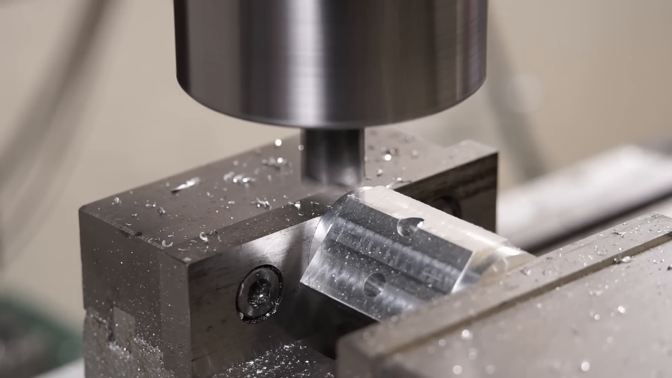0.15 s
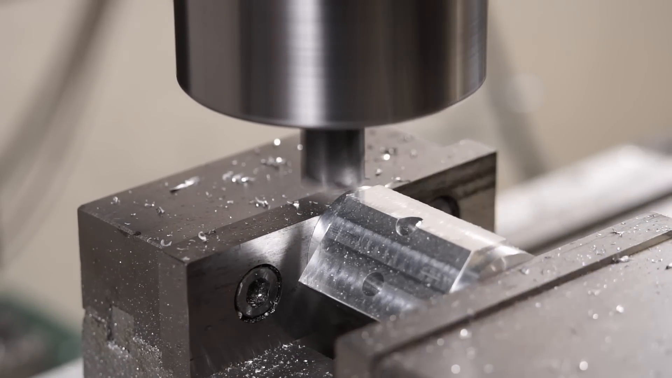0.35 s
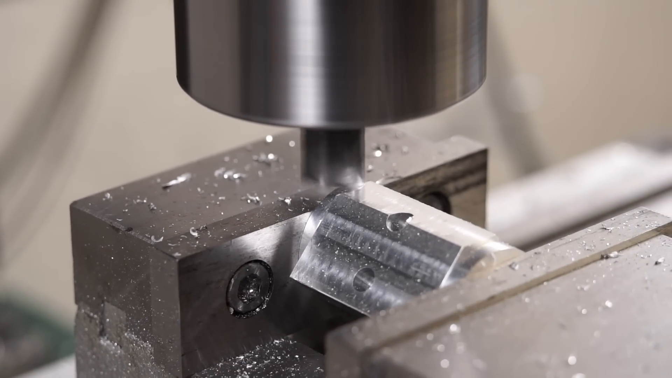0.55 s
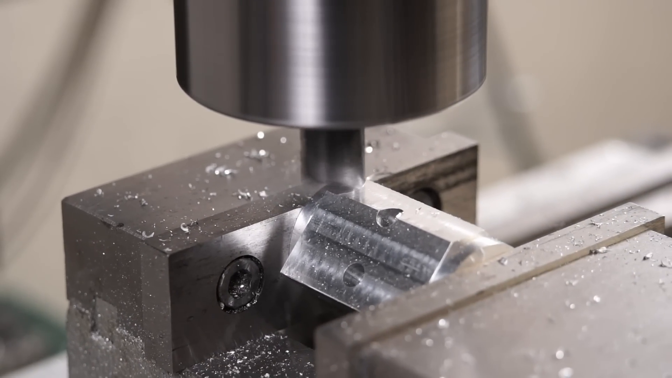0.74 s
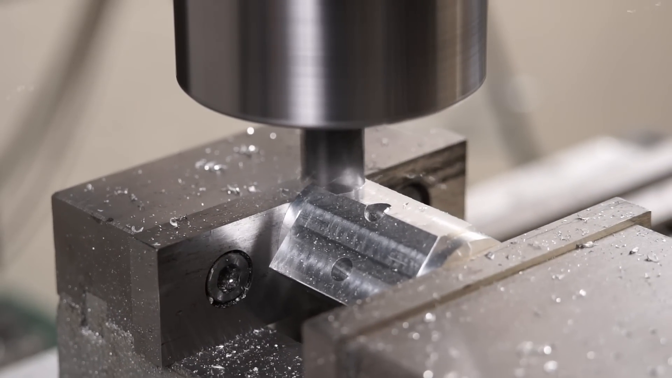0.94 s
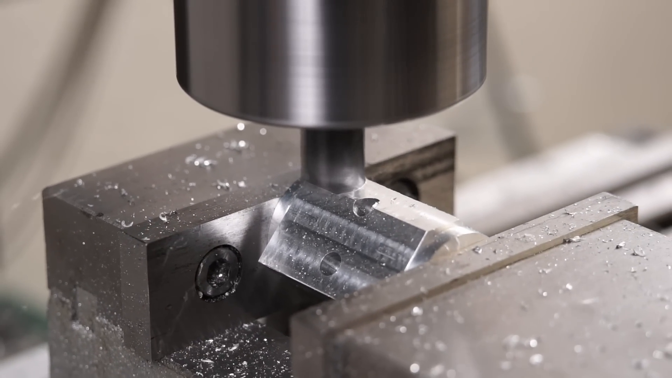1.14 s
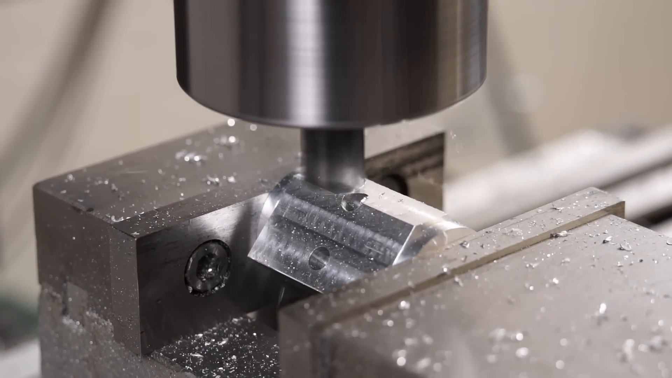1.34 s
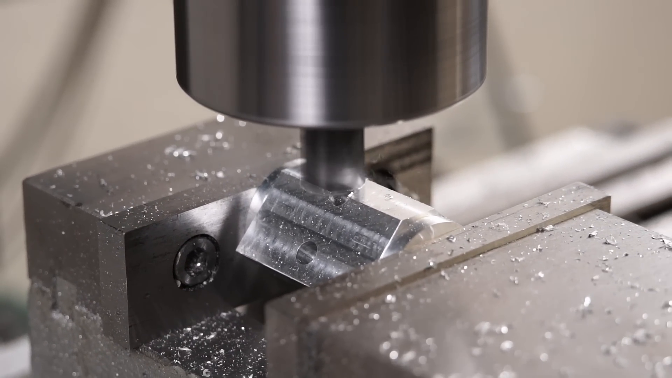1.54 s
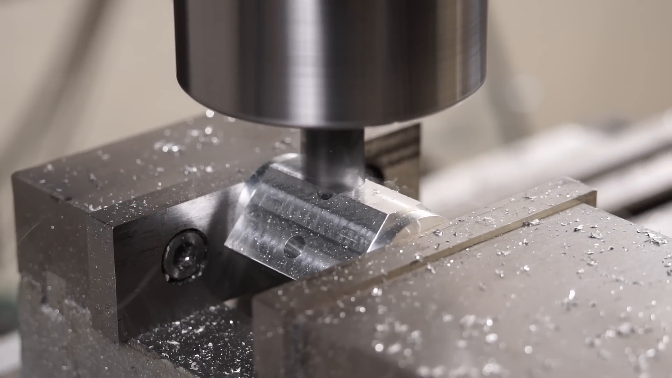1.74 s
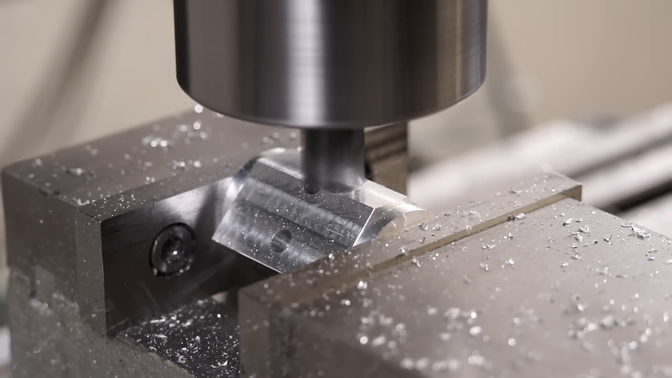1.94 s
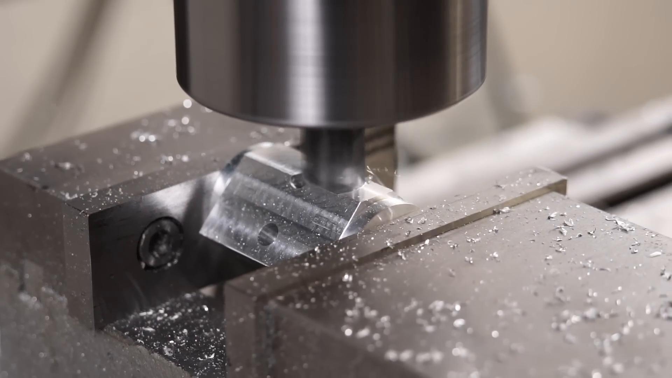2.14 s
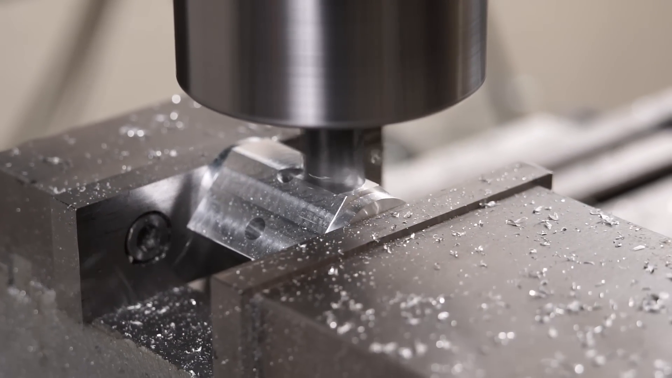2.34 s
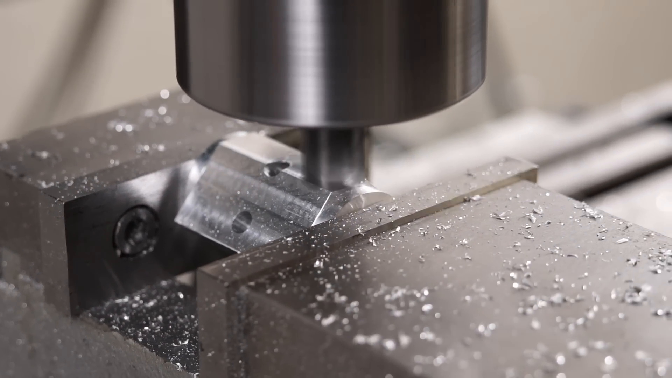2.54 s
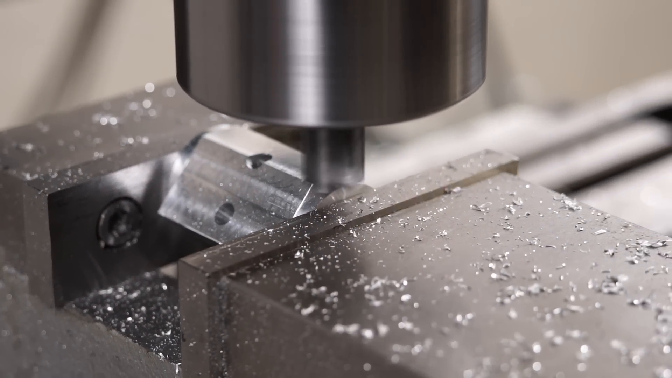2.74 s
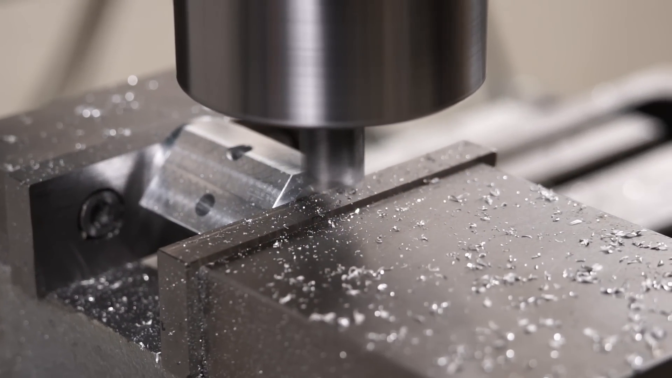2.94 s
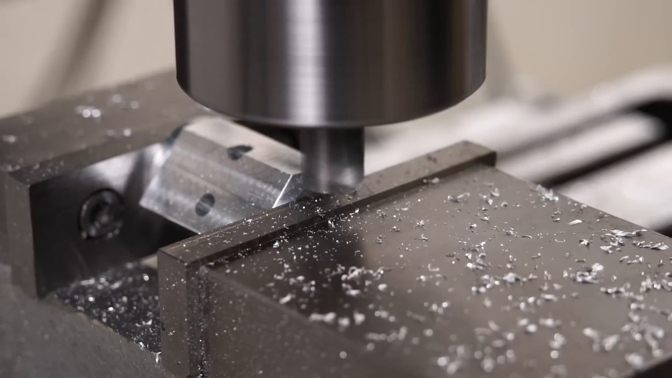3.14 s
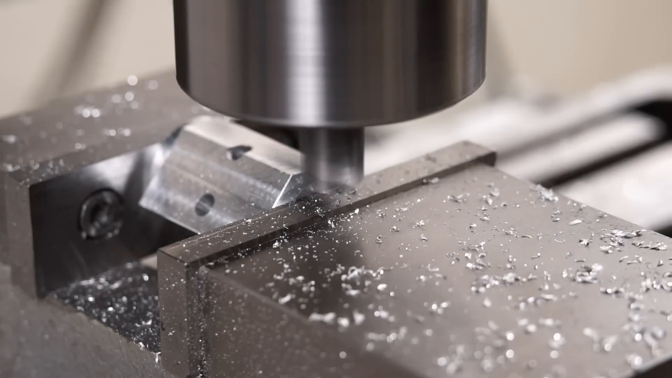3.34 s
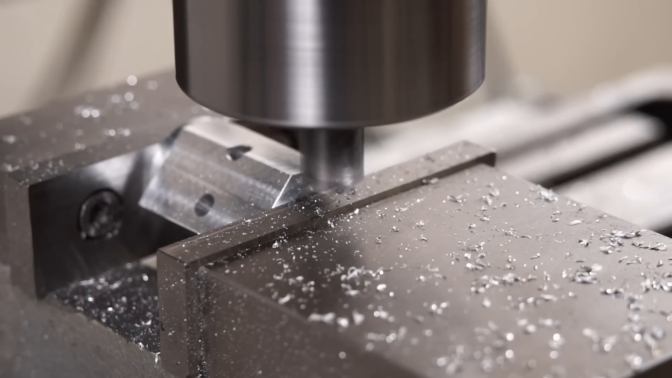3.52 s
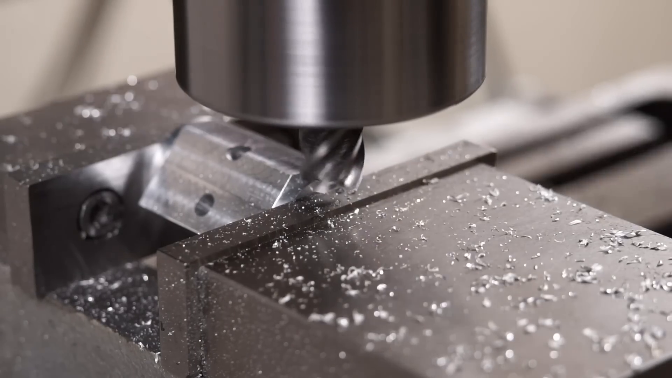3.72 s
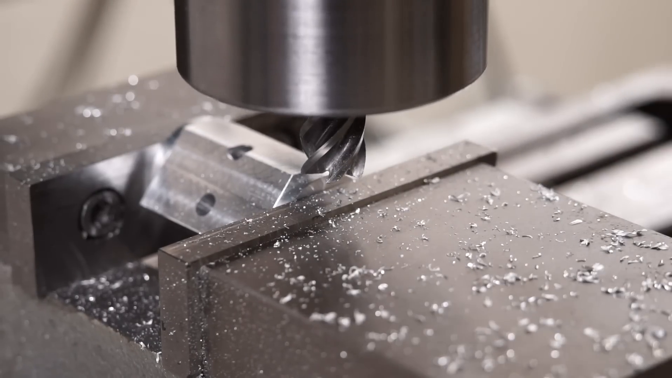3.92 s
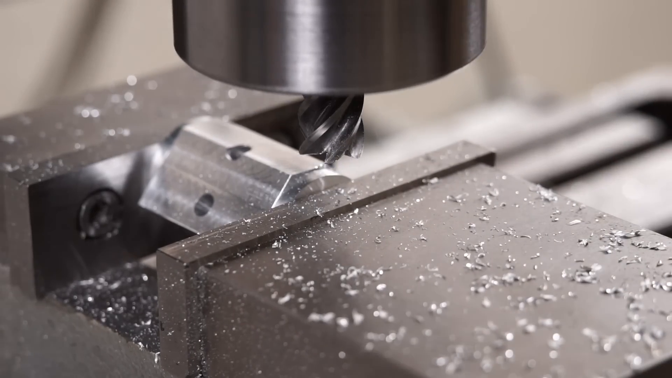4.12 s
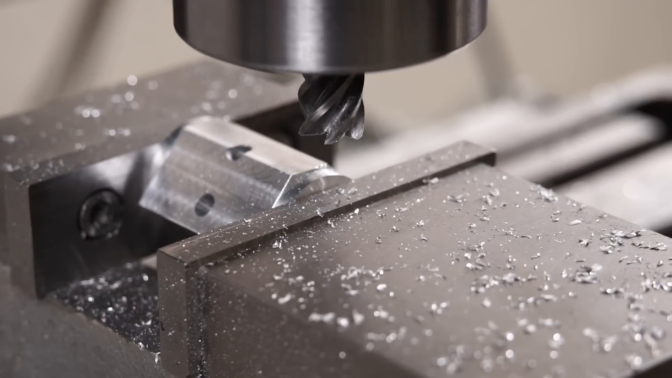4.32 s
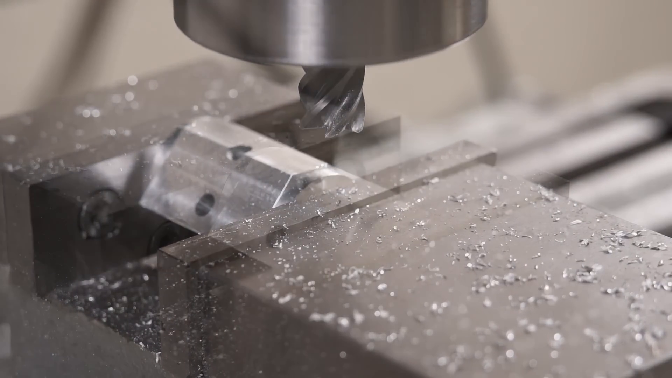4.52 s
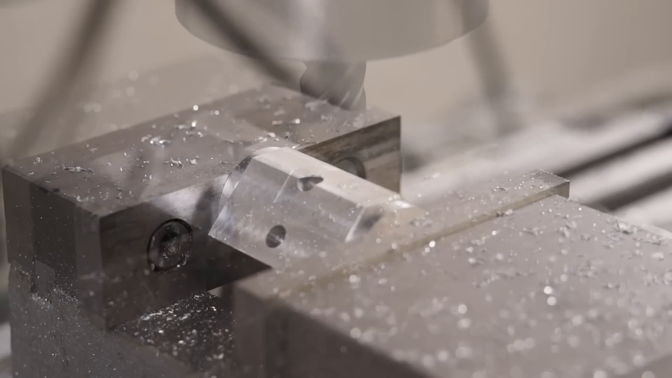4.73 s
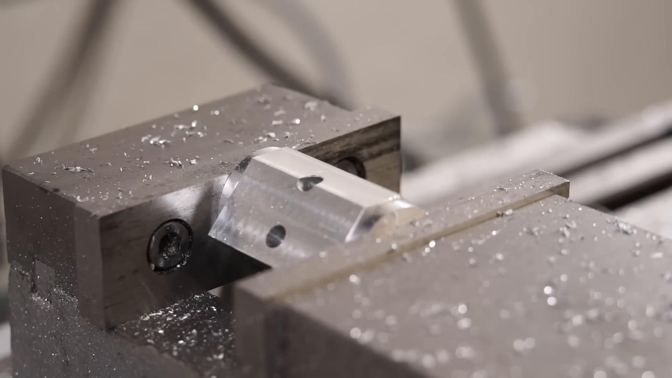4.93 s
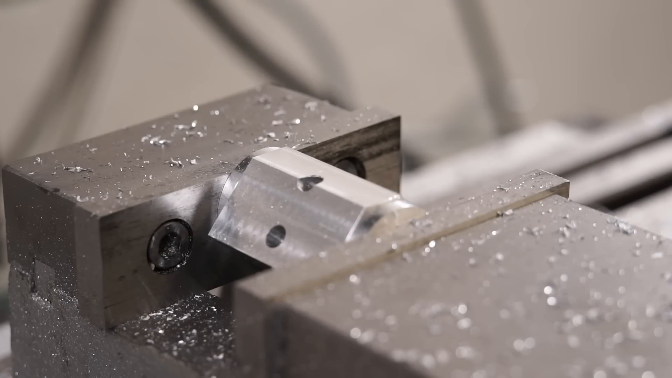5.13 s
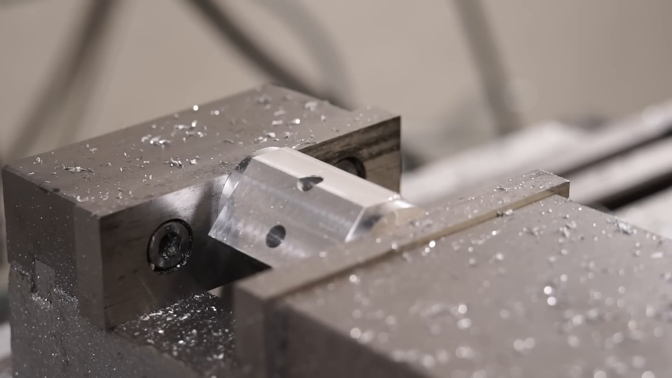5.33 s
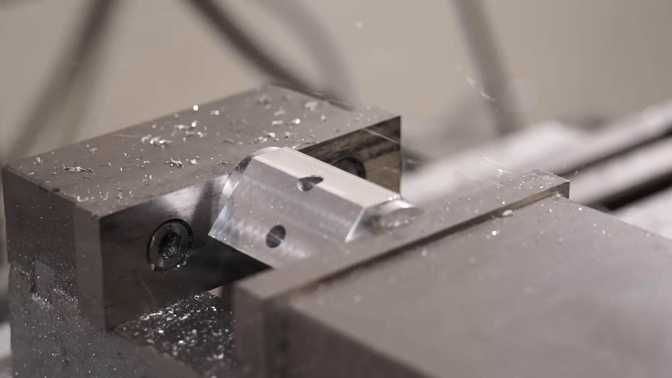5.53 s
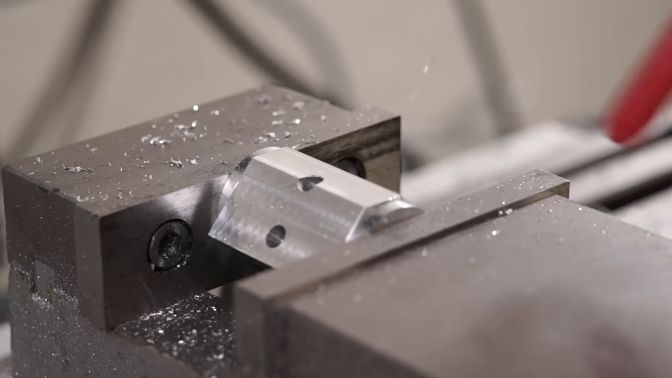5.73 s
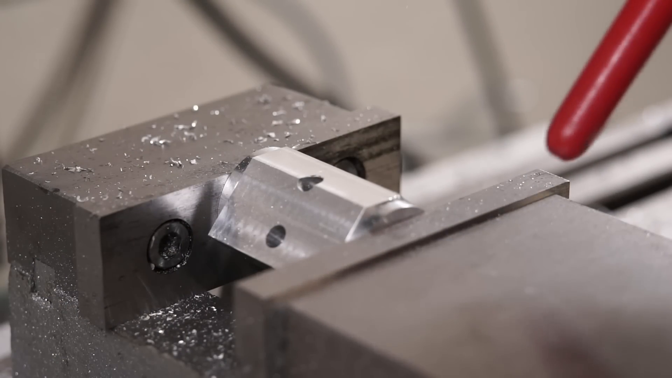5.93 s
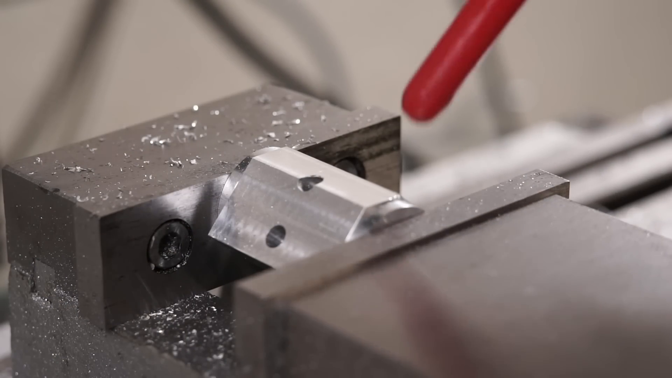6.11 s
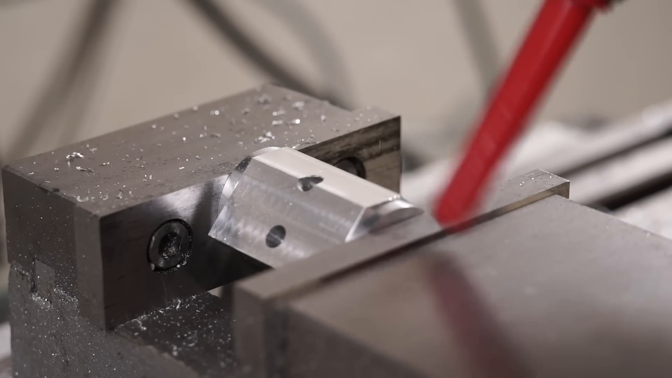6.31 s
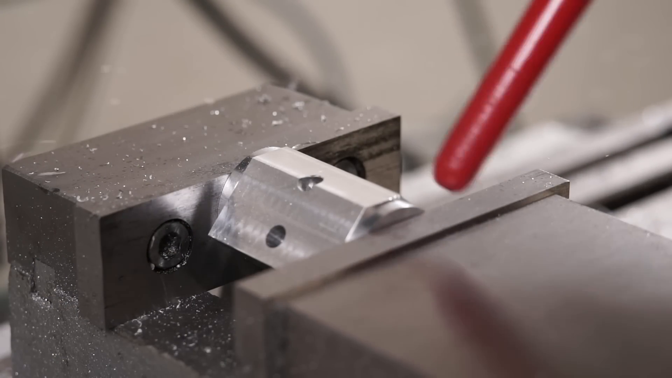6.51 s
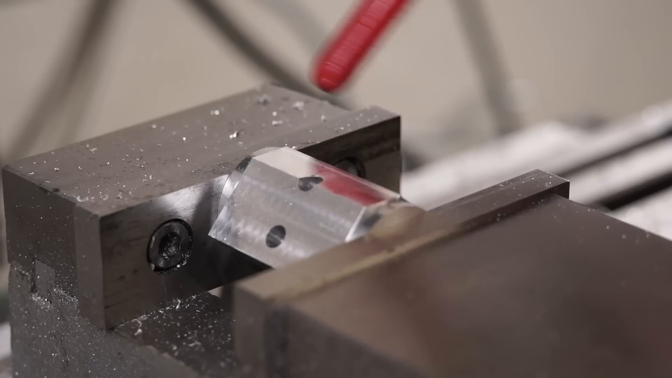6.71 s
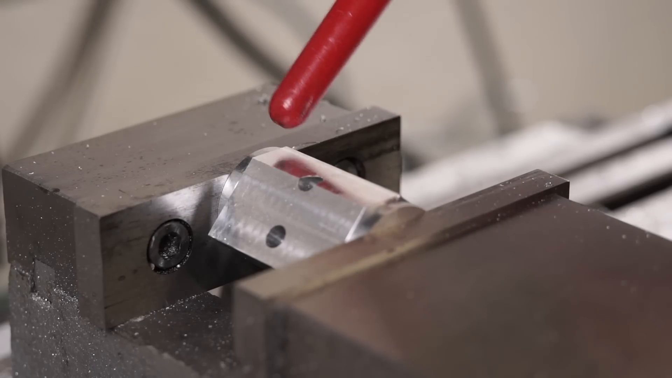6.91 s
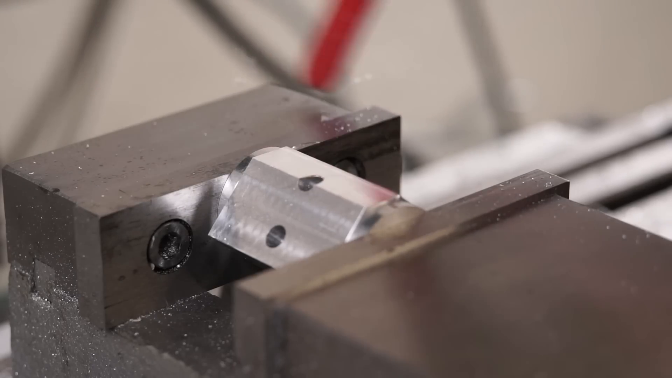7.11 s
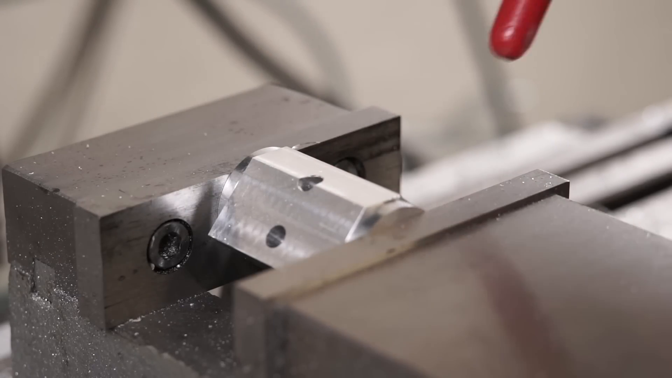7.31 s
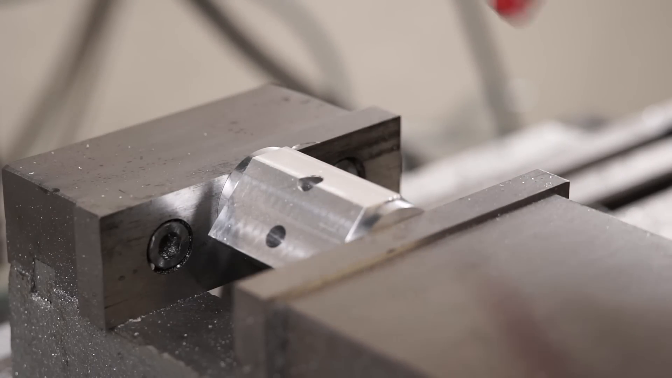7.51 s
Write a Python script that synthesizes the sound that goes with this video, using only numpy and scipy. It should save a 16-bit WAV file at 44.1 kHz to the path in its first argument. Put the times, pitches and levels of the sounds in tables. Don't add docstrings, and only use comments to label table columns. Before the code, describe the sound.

Steady metallic cutting roar winds down with scraping and knocking, a ticking motor lift follows, then rapid hissing squeezes of a hand air blower.

```python
import sys
import numpy as np
from scipy import signal
from scipy.fft import rfft, irfft, next_fast_len
from scipy.io import wavfile
from scipy.ndimage import map_coordinates

SR = 44100
rng = np.random.default_rng(int(sys.argv[2]) if len(sys.argv) > 2 else 0)


def to_wav(s):
    ch = np.atleast_2d(s).T
    pcm = np.round(np.clip(ch, -1, 1) * 32767)
    wavfile.write(sys.argv[1], SR, pcm.astype(np.int16))


def ratio(d):
    e = np.asarray(d, float) / 20
    return 10 ** e


N = 333396
COARSE = 16


def rms_one(x):
    return x / np.sqrt(np.mean(x ** 2) + 1e-20)


def in_time(table):
    s, *columns = np.transpose(table)
    return [np.interp(np.arange(N) / SR, s, c, left=-140, right=-140) for c in columns]


def coloured(spectrum):
    hz, db = np.transpose(spectrum)
    size = next_fast_len(N)
    log_hz = np.log(np.arange(size // 2 + 1) * SR / size + 1)
    shape = ratio(np.interp(log_hz, np.log(hz), db))
    return rms_one(irfft(rfft(rng.standard_normal(size)) * shape, size)[:N])


def band(x, low, high):
    return rms_one(signal.sosfilt(signal.butter(4, [low, high], "band", fs=SR, output="sos"), x))


def noise_band(low, high):
    return band(rng.standard_normal(N), low, high)


def drift(rate):
    r = np.exp(-64 * np.pi * rate / SR)
    white = rng.standard_normal(N // 32 + 1002)
    slow = signal.lfilter([1], [1, -2 * r, r * r], white)[1000:]
    return np.interp(np.arange(N) / 32, np.arange(len(slow)), rms_one(slow))


def resonances(modes, patchy_db=0., rate=14):
    white, out = rng.standard_normal(N), 0
    for k, (hz, width, db) in enumerate(modes):
        r = np.exp(-np.pi * width / SR)
        section = [1, 0, -1, 1, -2 * r * np.cos(2 * np.pi * hz / SR), r * r]
        swell = ratio(patchy_db * drift(rate)) if patchy_db else 1
        ring = signal.sosfilt([section, section], np.roll(white, 5003 * k))
        out = out + ratio(db) * swell * rms_one(ring)
    return out


def bursts(events, column, decay_s, rise_s=0.00059):
    jumps = np.full(N, 1e-18)
    rows = np.array(events)
    jumps[np.round(rows[:, 0] * SR).astype(int)] = ratio(rows[:, column])
    fall, rise = np.exp(-1 / (decay_s * SR)), np.exp(-1 / (rise_s * SR))
    return signal.lfilter([1 - rise], np.convolve([1, -fall], [1, -rise]), jumps)


def strokes(rows, column, fade_s):
    t = np.arange(N) / SR
    return sum(row[column] * np.clip(np.minimum(t - row[0], row[1] - t) / fade_s, 0, 1) for row in rows)


def hump(start, length, rise, fall, swell_db=0., size=1):
    t = np.arange(0, N, size) / SR - start
    swell = swell_db * (np.clip(t / length, 0, 1) - .5)
    return swell - rise * np.maximum(-t, 0) - fall * np.maximum(t - length, 0)


def spike(peak_s, rise_s, fall_s, haste=1):
    return hump(peak_s, 1e-4, 20 / rise_s, haste * 20 / fall_s, size=COARSE)


def filled(coarse):
    return np.interp(np.arange(N) / COARSE, np.arange(len(coarse)), coarse)


def bent(x, share):
    at = np.arange(N) + np.cumsum(share - np.mean(share))
    return map_coordinates(x, [at], order=3, mode="mirror")


# (time [s], level [dB])
SHOP_LEVEL = [(4.662, -68), (4.72, -68), (5.42, -67), (5.7, -66), (6.15, -70), (6.22, -73.5), (6.6, -80),
              (6.66, -73), (7.2, -76), (7.32, -83), (7.53, -82), (7.56, -72)]
# (frequency [Hz], density [dB per Hz])
SHOP_COLOUR = [(18, -44), (30, -14), (48, -26), (64, -18), (149, -13), (397, -5), (600, -5.5), (780, -27),
               (1320, -120)]
# (frequency [Hz], width [Hz], level [dB])
FAN_HUMS = [
    (122.7, 18, -8.5),
    (168.4, 28, -3.5),
    (192.4, 25, -7),
]


def shop():
    level_db, = in_time(SHOP_LEVEL)
    murmur = rms_one(coloured(SHOP_COLOUR) + resonances(FAN_HUMS))
    mic_hiss = noise_band(40.3, 3400) + 0.29 * noise_band(3400, 15000)
    return murmur * ratio(level_db + 1.2 * drift(6.7)) + ratio(-84.5) * mic_hiss


def lift_levels():
    start_s, stop_s, slack_s = 3.866, 4.42, 0.042
    fall = 525
    run = hump(start_s, stop_s - start_s, 9000, fall)
    late = hump(start_s + slack_s, stop_s - start_s - slack_s, 900, fall, swell_db=-6.0)
    end_stop = [(4.4757, -58.5)]   # (s, peak dB)
    bump = bursts(end_stop, column=1, decay_s=0.012) + ratio(-22.0) * bursts(end_stop, column=1, decay_s=0.083)
    idle = ratio(-73 + hump(3.8, 0.076, 300, 300))
    motor = ratio(-47 + run) + bump + idle
    slide = ratio(-61.5 + np.minimum(run, late)) + ratio(2.0) * bump
    thin = ratio(-82.5 + run) + ratio(-20.0) * bump
    return motor, slide, thin


# (frequency [Hz], density [dB per Hz])
LIFT_COLOUR = [(24, -65), (40, -34), (226, -8.5), (529, 4), (770, -3), (942, 4), (1950, -18), (2440, -15),
               (3830, -25), (7170, -23.5), (16000, -70)]
# (frequency [Hz], width [Hz], level [dB])
COLUMN = [(580, 74, -7), (970, 250, -1), (1626, 240, -6.5), (2390, 87, -3.5), (3050, 84, -19),
          (3260, 130, -10)]
# (frequency [Hz], width [Hz], level [dB])
SLIDE_MODES = [(5250, 500, -11), (7200, 820, -13), (8100, 400, -18)]
# (time [s], peak [dB], bright part [dB])
TICKS = [(3.8678, -62, -63), (3.9114, -47, -62), (3.919, -54, -74), (3.9594, -47, -62),
         (3.9943, -41.5, -57), (4.022, -48, -72), (4.058, -42.5, -66), (4.066, -51, -70), (4.117, -42, -60),
         (4.1434, -60, -64), (4.1765, -39, -60), (4.19, -49, -66), (4.252, -43, -56), (4.295, -55, -66),
         (4.306, -36.5, -62), (4.334, -53, -58), (4.383, -48, -62), (4.45, -54, -76), (4.4772, -42, -55),
         (4.619, -74, -79)]
# (frequency [Hz], width [Hz], level [dB])
TICK_MODES = [(2500, 300, -5), (3050, 500, 0), (4200, 1400, -4), (5500, 1400, -5), (7200, 1200, -7)]


def lift():
    motor, rub, faint = lift_levels()
    grind, buzz = coloured(LIFT_COLOUR), ratio(.8 * drift(70))
    drone = band(grind + ratio(-4.0) * resonances(COLUMN), 60, 1940) * motor * buzz
    slide = band(band(grind, 1660, 8500) + resonances(SLIDE_MODES), 960, 8000) * rub * buzz
    thin = band(rng.standard_normal(N) + resonances([(12700, 500, -15)]), 8000, 15000)
    thin = thin * (faint + ratio(-15.0) * bursts(TICKS, column=2, decay_s=0.0076))
    ticks = ratio(-7.0) * bursts(TICKS, column=1, decay_s=0.011) * band(resonances(TICK_MODES), 1400, 4800)
    snaps = ratio(-1.0) * bursts(TICKS, column=2, decay_s=0.014) * noise_band(4800, 7900)
    chip = [(4.3343, -44.5)]
    ping = bursts(chip, column=1, decay_s=0.0028) + ratio(-15.0) * bursts(chip, column=1, decay_s=0.02)
    ping = ratio(-6.5) * ping * resonances([(6800, 500, -2), (10000, 820, 0), (5000, 3200, -5)])
    return drone + slide + ticks + snaps + ping + thin


# (time [s], peak [dB])
CHAFES = [(3.386, -31), (3.4094, -29), (3.4301, -33), (3.458, -28), (3.466, -33), (3.481, -32),
          (3.489, -34), (3.499, -36), (3.522, -28), (3.535, -36), (3.561, -38), (3.6127, -40)]
# (frequency [Hz], width [Hz], level [dB])
CHAFE_MODES = [
    (9700, 600, -9),
    (10600, 1000, 0),
]
# (time [s], peak [dB])
SQUEAKS = [
    (3.568, -48),
    (3.613, -54),
    (3.663, -52),
    (3.747, -53),
    (3.803, -72),
]
# (frequency [Hz], width [Hz], level [dB])
SQUEAK_MODES = [(9700, 500, -3), (12700, 500, -5), (14500, 900, -8)]
# (time [s], peak [dB])
KNOCKS = [
    (3.508, -31),
    (3.54, -25.5),
    (3.592, -33),
    (3.622, -30),
    (3.6454, -36),
    (3.6733, -47),
    (3.7271, -48),
    (3.7451, -41),
    (3.756, -43),
    (3.767, -60),
]
# (time [s], level [dB])
ECHO_OF_STOP = [
    (3.75, -73),
]


def chafes():
    white = rng.standard_normal(N)
    rub = resonances(CHAFE_MODES) + .35 * band(white, 6000, 15000)
    rub = ratio(-13) * bursts(CHAFES, column=1, decay_s=0.006, rise_s=0.002) * rub
    squeak = bursts(SQUEAKS, column=1, decay_s=0.004, rise_s=0.001) * resonances(SQUEAK_MODES)
    knock = ratio(-8.0) * bursts(KNOCKS, column=1, decay_s=0.0025, rise_s=0.0007) * band(white, 1500, 6700)
    echo = bursts(ECHO_OF_STOP, column=1, decay_s=0.05) * band(white, 2000, 15500)
    return rub + squeak + knock + echo


# (time [s], pitch [Hz], level [dB])
WHINE = [(0, 852, -55), (3.1, 859, -74), (3.25, 809, -48), (3.4, 595, -50), (3.48, 470, -44),
         (3.56, 337, -48), (3.63, 248.8, -51), (3.69, 190, -57.5), (3.745, 145, -72), (3.78, 70.2, -88),
         (3.86, 39.7, -100)]


def slowed(full_db, loss_db, bend):
    hz = np.maximum(in_time(WHINE)[0], 1)
    thirds = np.maximum(np.log(WHINE[0][1] / hz) / np.log(3), 0)
    return full_db - loss_db * thirds ** bend


# (multiple [1], level [dB])
WHINE_ORDERS = [
    (2, -6.5),
    (2.32, -2),
    (3, -7),
    (4, -22),
]
# (frequency [Hz], gain [dB])
CASING = [(150, -9), (300, -7.5), (480, -0.5), (620, -4), (800, -2.5), (1000, -6), (1300, -14), (1560, 1.5),
          (1850, -10), (2300, 3.5), (3500, -9)]


def whine():
    hz, db = in_time(WHINE)
    overtones_db = slowed(-1.5, -6.794, 1)
    phase, out = 2 * np.pi * np.cumsum(hz * (1 + .025 * drift(12))) / SR, 0
    casing_hz, casing_db = np.transpose(CASING)
    for k, order_db in [(0.99, -overtones_db)] + WHINE_ORDERS:
        rate = 60 + 20 * k
        smeared = (.75 + drift(rate)) * np.sin(k * phase) + drift(rate) * np.cos(k * phase)
        radiated_db = np.interp(k * hz, casing_hz, casing_db)
        out = out + ratio(db + overtones_db + order_db + radiated_db) * smeared
    out = out + ratio(hump(3.25, 0.16, 200, 500)) * resonances([(785, 53, -48)])
    return signal.sosfilt(signal.butter(3, 170, "high", fs=SR, output="sos"), out)


# (frequency [Hz], density [dB per Hz])
SPINDLE_COLOUR = [(18, -78), (30, -35), (320, -11), (650, -5), (780, -6), (1100, -2.5), (1430, -8),
                  (2480, -7.5), (3500, -11), (5700, -12.5), (7000, -12.5), (11500, -15.5), (16000, -14)]
# (frequency [Hz], width [Hz], level [dB])
HEAD = [(2328, 25, -21), (2730, 200, -13), (2728, 60, -22), (4600, 300, -18), (5430, 200, -23),
        (6230, 130, -15.5), (6390, 170, -15.5), (6800, 200, -20), (7320, 170, -19.5), (7735, 50, -28),
        (7908, 50, -23), (8060, 120, -24), (8492, 45, -23), (8945, 45, -27), (9710, 100, -26),
        (10500, 900, -13), (13900, 570, -29), (15300, 500, -19)]
# (frequency [Hz], width [Hz], level [dB])
HOUSING = [(853.5, 84, -13.5), (922, 165, -11.5), (1028.5, 46, -13), (2070, 15, -30)]
# (start [s], end [s], level [dB])
FEED_JOLTS = [
    (0.47, 0.687, -65),
    (1.3, 1.76, -66.5),
    (2.42, 2.6, -62),
]


def spindle():
    turning = np.arange(N) < WHINE[-1][0] * SR
    shaken = coloured(SPINDLE_COLOUR) + resonances(HEAD, patchy_db=-0.5)
    load_db = np.maximum(hump(0.6, 1.9, 10, 10), -2.5)
    gear_hz = 1028 * (1 + 0.01185 * drift(8.2))
    gear = ratio(-12 + 2.5 * drift(31) + 2.0 * drift(1.4)) * np.sin(2 * np.pi * np.cumsum(gear_hz) / SR)
    shaken = shaken + ratio(slowed(3.4, 11, 0.9) + load_db) * (resonances(HOUSING) + gear)

    body = ratio(slowed(-43, 3.6, 3.2) - 2.0 + 0.23 * drift(25)) * band(shaken, 257, 2190)
    mid = ratio(slowed(-44.5, 5.7, 2.23) + 1.0 * drift(37)) * band(shaken, 1600, 5075)
    hiss = ratio(slowed(-45, 13.3, 1.65)) * band(shaken, 4170, 8920)
    top = ratio(slowed(-47, 16, 1.4)) * band(shaken, 9500, 16800)
    hiss = ratio(0.44 * drift(59)) * (hiss + top)
    grain = ratio(np.minimum(slowed(1.25, -1.3, 1), 2.8) * drift(260))
    jolts = strokes([(a, b, ratio(db)) for a, b, db in FEED_JOLTS], column=2, fade_s=0.058)
    rumble = (ratio(slowed(-66.5, 3, 1.8)) + jolts) * ratio(0.83 * drift(12.0)) * band(shaken, 20, 337)
    return turning * (body + grain * (mid + hiss) + rumble)


# (peak [s], rise [s per 20 dB], fall [s per 20 dB], level [dB], low share [0-1])
FLAPS = [
    (5.532, .05, .02, -29, .7),
    (5.652, .03, .02, -33, .6),
    (5.99, .03, .02, -28, .4),
    (6.188, .04, .04, -31, .8),
    (6.3075, .006, .02, -27, .1),
    (6.932, .005, .02, -29, .2),
    (7.205, .015, .012, -28, .05),
    (7.293, .015, .03, -32, .2),
]


def flaps(jet):
    dull, bright, out = band(jet, 3300, 7500), band(jet, 6000, 15500), 0
    for peak_s, rise_s, fall_s, db, low in FLAPS:
        gain = filled(ratio(db + spike(peak_s, rise_s, fall_s)))
        out = out + gain * (np.sqrt(low) * dull + np.sqrt(1 - low) * bright)
    return out


# (peak [s], rise [s per 20
# dB], fall [s per 20 dB], level [dB], place [0-2.5])
STRIKES = [
    (4.666, 0.003, 0.13, -48.5, 2.5),
    (5.03, 0.034, 0.25, -44, 2),
    (5.462, 0.0051, 0.19, -48.5, 0.3),
    (5.525, 0.034, 0.028, -35, 1.64),
    (5.97, 0.12, 0.17, -48.5, 0.25),
    (6.185, 0.015, 0.029, -42, 1.74),
    (6.507, 0.034, 0.021, -31.5, 2.5),
    (6.954, 0.019, 0.071, -40, 1.24),
    (7.226, 0.003, 0.16, -30, 1.79),
    (7.537, 0.027, 2.1, -35.5, 1.52),
]


def struck(haste):
    return [ratio(2 * (db + spike(peak_s, rise_s, fall_s, haste))) for peak_s, rise_s, fall_s, db, place in STRIKES]


# (full flow from [s], for [s], level [dB], low part [dB], swell to the end [dB])
REFILLS = [
    (5.72, 0.068, -28.5, 1.5, -3.5),
    (6.047, 0.063, -28, 0.5, 1.5),
    (6.376, 0.047, -29.5, 1, 2.5),
    (6.715, 0.056, -35, 1, -2.5),
    (7.05, 0.053, -34, 1, 0),
    (7.405, 0.055, -36.5, 5, -2),
]


def arch():
    t = np.arange(0, N, COARSE) / SR
    bows = []
    for start, length, *_ in REFILLS:
        half = length / 2
        bows.append(np.clip(((t - start - half) / (half + 0.017)) ** 2, 0, 1))
    return filled(np.min(bows, axis=0))


def flow(rows, layer):
    over_db, share, rise, fall = layer
    power = 0
    for start, length, db, low_db, sudden, swell_db in rows:
        shape = hump(start, length, rise * sudden, fall, swell_db, size=COARSE)
        power = power + ratio(2 * (db + over_db + share * low_db + shape))
    return power


# (full flow from [s], for [s], level [dB], rise [dB per s], haste of the fall [1])
PUFFS = [
    (4.6632, 0.045, -47.5, 9000, 1.11),
    (5.01, 0.08, -47, 1800, 0.87),
]
# (over the puff [dB], room fall [dB per s], lingering level [dB])
PUFF_LAYERS = [
    (-2.5, 75, -63),
    (0.5, 89.5, -76),
    (-8.5, 105, -76.5),
    (-12.5, 98, -75),
]
# (full flow from [s], for [s], level [dB], low part when aimed at the work [dB], suddenness [1])
SQUEEZES = [
    (5.485, 0.058, -39.5, -25, 1.8),
    (5.58, 0.072, -34, 5, 0.17),
    (5.865, 0.095, -30, 2.5, 0.82),
    (6.184, 0.1, -29.5, -1.5, 1.1),
    (6.512, 0.11, -30, -2, 1.1),
    (6.839, 0.13, -28.5, -4, 2.2),
    (7.187, 0.09, -32.5, -1, 0.9),
    (7.535, 0.05, -39, -25, 1.3),
]
# (over the stroke [dB], share of low part [1], rise [dB per s], fall [dB per s])
SQUEEZE_LAYERS = [
    (-18, 1.75, 360, 246),
    (-10.5, 1.08, 453, 396),
    (-9.5, 0.22, 454, 500),
    (0.15, 0.01, 600, 650),
]
REFILL_LAYERS = [
    (-21, 1.44, 42, 210),
    (-12.5, 0.24, 180, 380),
    (-3.5, 0.11, 400, 390),
    (0, 0.01, 560, 900),
]
SPLASH_DB = [
    -7,
    -4.5,
    -11,
    -7,
]
NEAR_S = 5.457


def blower_levels():
    t, keep = np.arange(0, N, COARSE) / SR, ratio(-120 * COARSE / SR)
    squeezes = [(*row, -1.5) for row in SQUEEZES]
    refills = [(*row[:4], 1, row[4]) for row in REFILLS]
    for k, (over_db, fall, linger_db) in enumerate(PUFF_LAYERS):
        far = (t >= PUFFS[0][0]) * ratio(2 * linger_db)
        for start, length, db, rise, haste in PUFFS:
            far = far + ratio(2 * (db + over_db + hump(start, length, rise, fall * haste, size=COARSE)))
        back = flow(refills, REFILL_LAYERS[k]) * ratio(-2 * 2 * arch()[::COARSE])
        splash = ratio(2 * SPLASH_DB[k]) * sum(struck(0.77))
        near = flow(squeezes, SQUEEZE_LAYERS[k]) + back + splash
        near = near + ratio(2 * -21) * signal.lfilter([1 - keep], [1, -keep], near) * 10
        yield filled(np.sqrt(np.where(t < NEAR_S, far, near))), filled(back / (near + 1e-20))


# (frequency [Hz], density [dB per Hz])
FAR_COLOUR = [(120, -51), (200, -9), (509, -10), (623, -2), (950, -5), (1000, -3), (2560, -9), (14900, -10),
              (16000, -22)]
# (frequency [Hz], density [dB per Hz])
JET_COLOUR = [(120, -66), (200, -53), (683, -22), (883, -14.5), (1080, -16.5), (1210, -13.5), (1590, -16),
              (2210, -12.5), (3830, -10.5), (15100, 17.5), (16000, 16)]
# (frequency [Hz], width [Hz], level [dB])
EDGES = [(4350, 460, -3), (5270, 910, 1), (6340, 600, -3.5), (6920, 300, 2), (8100, 570, -1),
         (10850, 820, -7.5), (13650, 680, -10), (13400, 750, -10), (14550, 600, -5)]
# (frequency [Hz], width [Hz], level [dB])
NOZZLE = [(6280, 200, -3), (7350, 60, -4), (7600, 150, 2.5), (8540, 60, -11), (12600, 100, -10),
          (13300, 120, -1), (13800, 200, 1), (14700, 130, 4), (14350, 120, 12), (15600, 150, 4)]
# (frequency [Hz], width [Hz], level [dB])
DEEP_SLOT = [(414, 930, 2), (636, 670, 8)]
HOLES = [(930, 190, 4), (1230, 610, 8)]
GAPS = [(2154, 340, 1.5), (2676, 180, 1), (1870, 320, -6.5)]


def blower():
    far = np.arange(N) < NEAR_S * SR
    near, begun = np.count_nonzero(far), np.arange(N) >= PUFFS[0][0] * SR
    (work, _), *layers = blower_levels()
    jet = np.where(far, coloured(FAR_COLOUR), coloured(JET_COLOUR))
    edges = bent(resonances(EDGES, patchy_db=3.0, rate=25), .04 * drift(10))
    pipe = bent(resonances(NOZZLE, patchy_db=3.0, rate=25), .015 * drift(12))
    edge_tone = resonances([(7620, 170, 0.65), (12200, 250, -2)])
    pipe = pipe + bent(edge_tone, -0.16 * arch()) * ratio(2.0 * drift(30))

    def hiss(low, high):
        return np.concatenate([band(jet[:near], low, high), band(jet[near:], low, high)])

    out = flaps(rng.standard_normal(N))
    bands = [(2980, 6120, 0.22), (6620, 9540, 0.73), (9800, 17300, 0.46)]   # (low Hz, high Hz, whistle)
    for (low, high, whistle), (gain, refill) in zip(bands, layers):
        piped = np.clip(0.73 * whistle * refill, 0, 1)
        mottled = rms_one(hiss(low, high) + 0.6 * ~far * band(edges, low, high))
        out = out + gain * (np.sqrt(1 - piped) * mottled + np.sqrt(piped) * band(pipe, low, high))
    for k, hollow in enumerate([DEEP_SLOT, HOLES, GAPS]):
        power = 0
        for strike, (*_, place) in zip(struck(1), STRIKES):
            power = power + strike * ratio(-2 * 10.5 * (place - k) ** 2)
        out = out + filled(np.sqrt(power)) * begun * rms_one(resonances(hollow))
    return (out + work * hiss(313, 2960)) * ratio(0.76 * drift(50))


def scene():
    mono = shop() + lift() + chafes() + whine() + spindle() + blower()
    return np.array([mono, mono])


def low_pass(x):
    return signal.sosfilt(signal.butter(12, 17000, fs=SR, output="sos"), x)


def record(dry):
    rounded = .4 * np.tanh(dry / .4)
    finished = signal.sosfilt(signal.ellip(14, .5, 80, 15800, fs=SR, output="sos"), rounded)
    return low_pass(finished)


dry = scene()
out = record(dry)
to_wav(out)
```